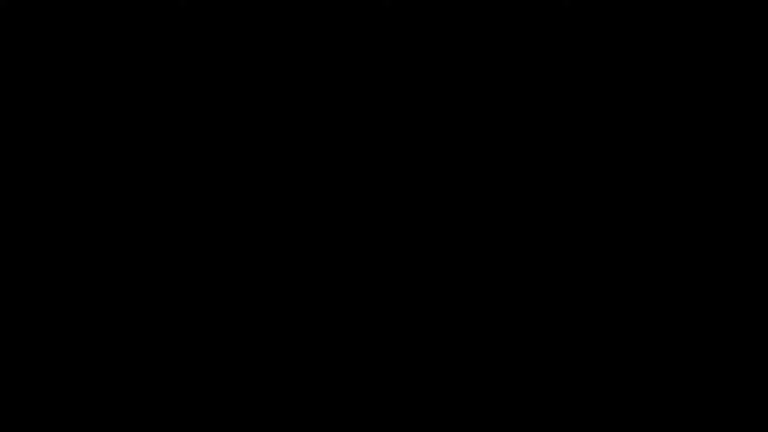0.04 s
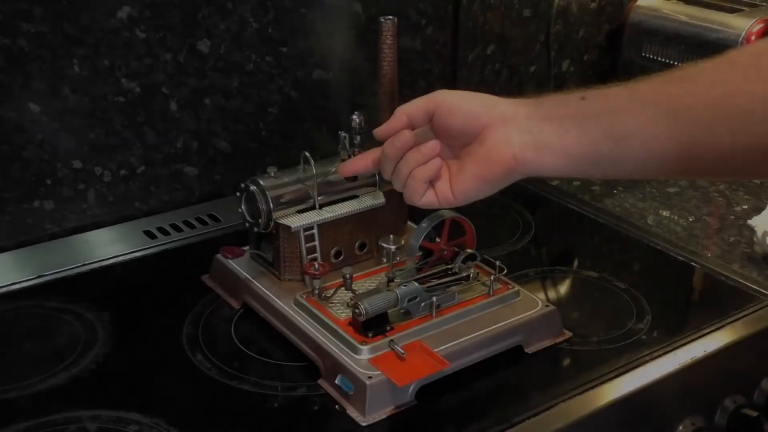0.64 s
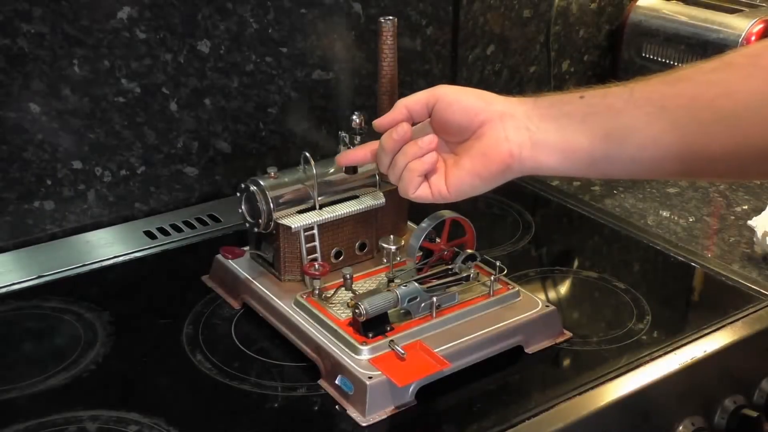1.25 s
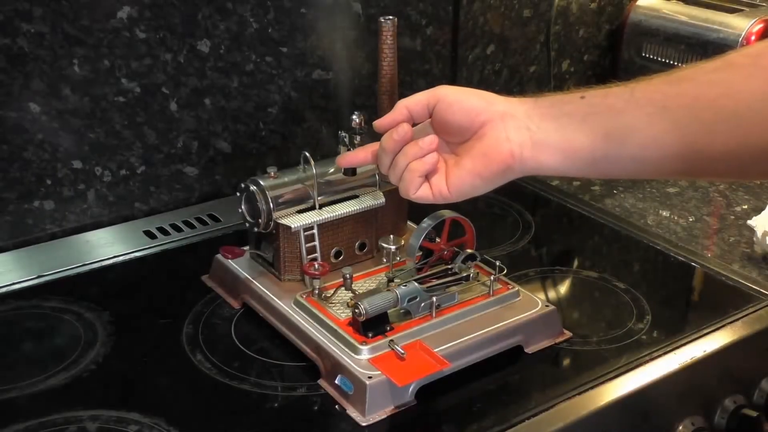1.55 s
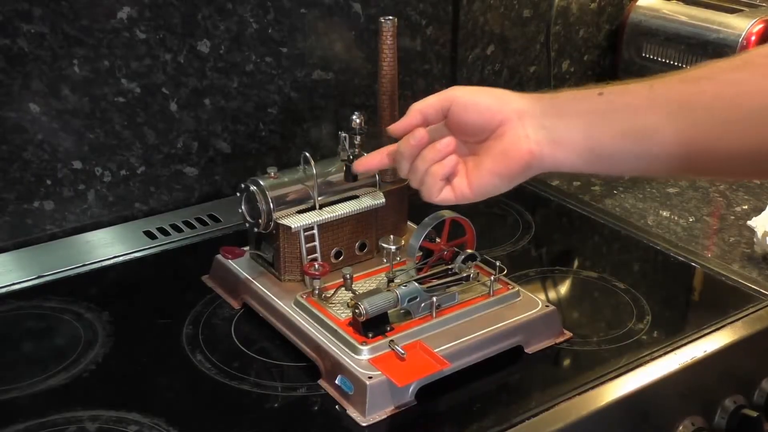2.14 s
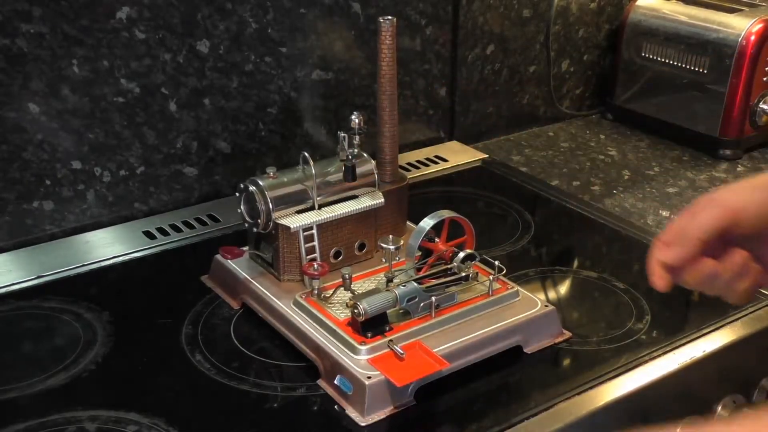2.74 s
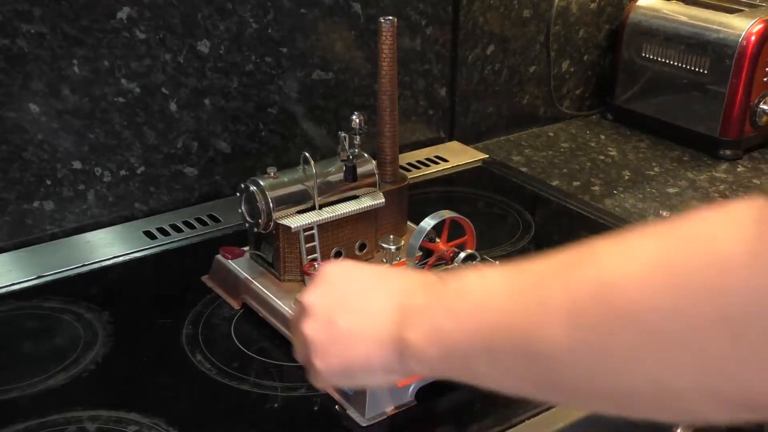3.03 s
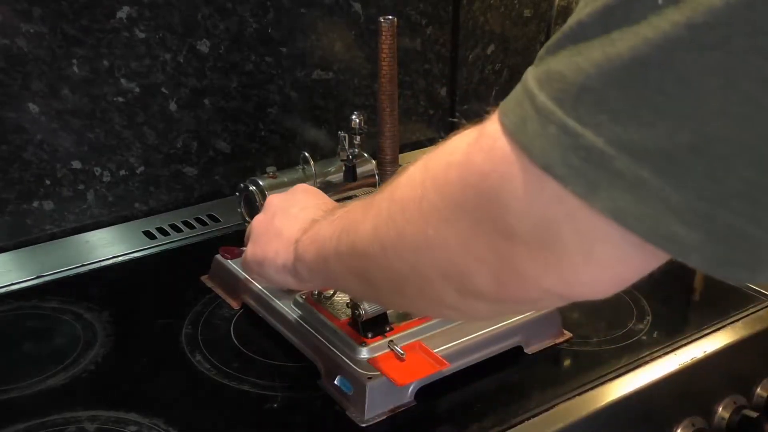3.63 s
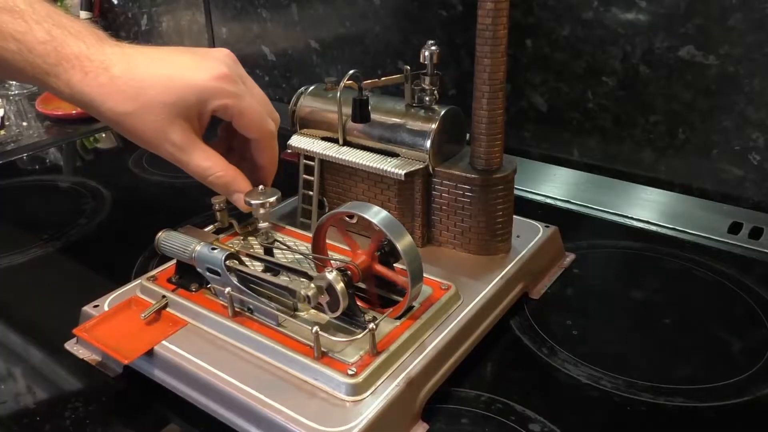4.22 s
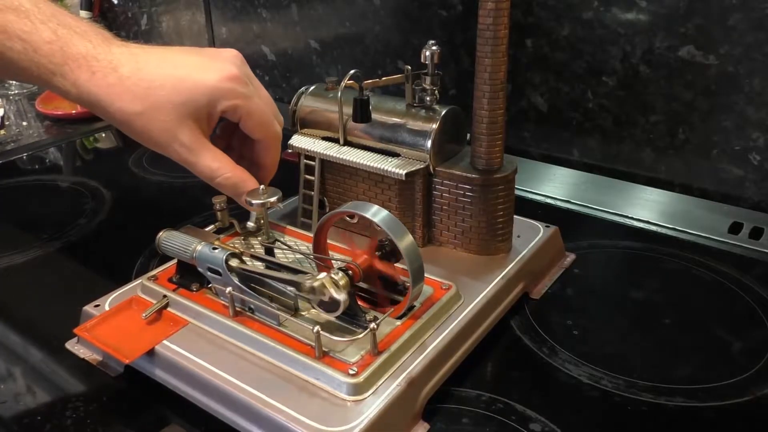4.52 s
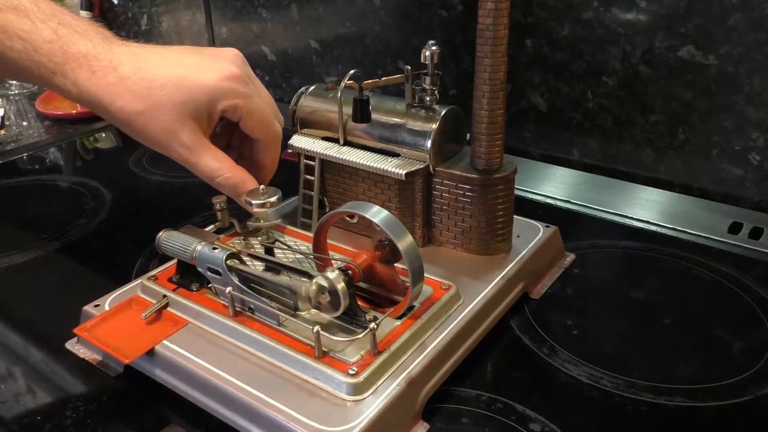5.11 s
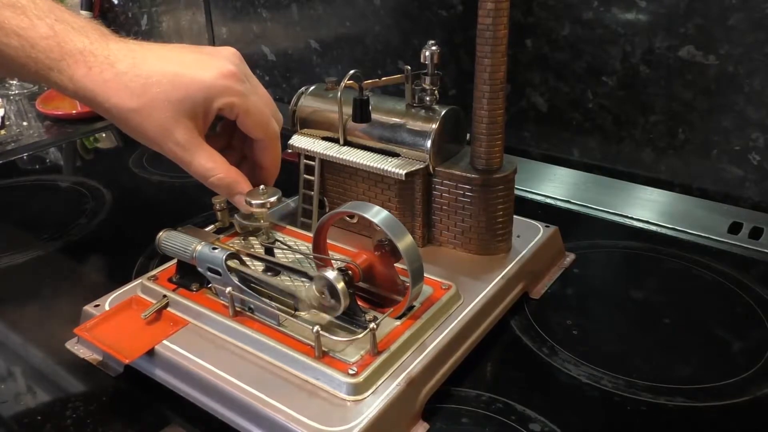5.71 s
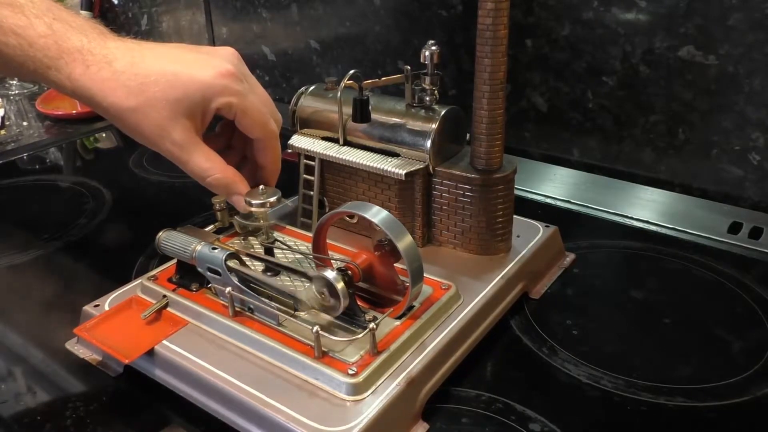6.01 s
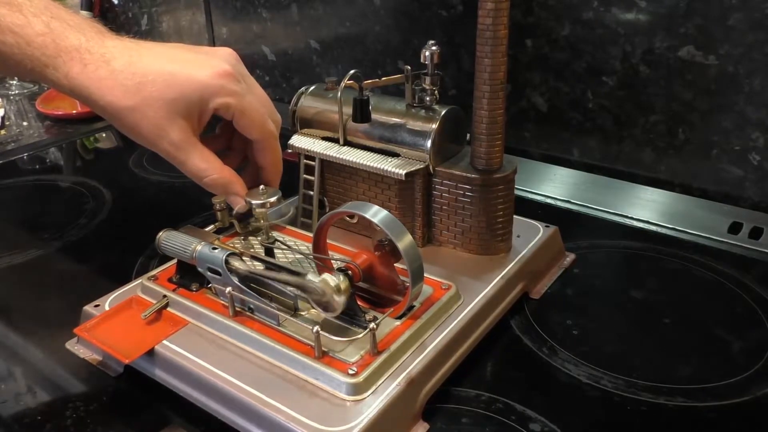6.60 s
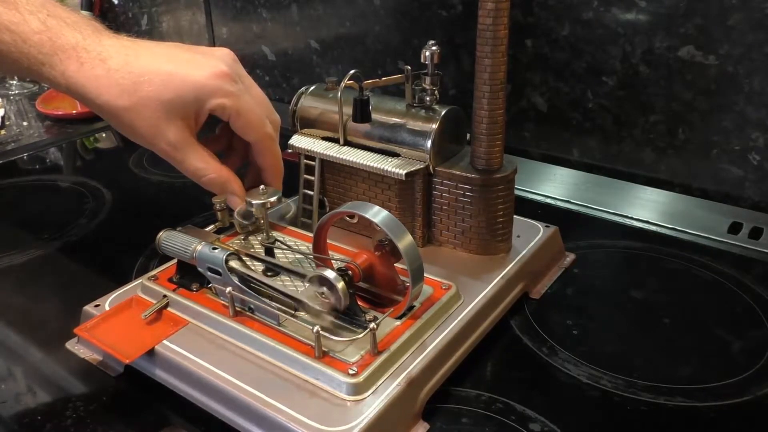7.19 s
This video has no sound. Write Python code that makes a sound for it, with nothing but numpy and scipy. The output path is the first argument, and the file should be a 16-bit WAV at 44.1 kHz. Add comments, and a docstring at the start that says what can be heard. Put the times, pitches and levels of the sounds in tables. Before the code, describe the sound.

A toy steam engine simmers in a small kitchen. Its whistle is opened twice, giving only a breathy, faintly ringing hiss while the boiler burbles. After a few dull bumps, the crank clanks and begins knocking slowly, then gathers speed into a rapid chug. Each knock rings the tin base, among steel clicks, small exhaust puffs and leaking steam, heard close by.

```python
"""Toy steam engine on a kitchen hob

The whistle is opened twice and gives only the breathy, faintly ringing hiss of a wet jet, while the
boiler burbles. After a few dull bumps the steam is let through: the crank clanks, knocks slowly,
gathers speed and settles near eleven turns a second. Each knock rings the tin base, among steel
clicks, exhaust puffs and leaking steam. The boiler simmers throughout in a small hard room."""
import sys
import numpy as np
from scipy import signal
from scipy.fft import rfft, irfft
from scipy.io import wavfile

SR = 44100
rng = np.random.default_rng(int(sys.argv[2]) if len(sys.argv) > 2 else 0)


def materialize(psi):
    """Save the field psi as 16-bit PCM at rate SR to the path in sys.argv[1].

    A 1-D psi becomes a single channel; in a 2-D psi each row is a channel.
    """
    bounded = np.clip(np.atleast_2d(psi).T, -1, 1)
    quanta = np.round(bounded * 32767).astype(np.int16)
    wavfile.write(sys.argv[1], SR, quanta)


N = 324135
TIME = np.arange(N) / SR

# modes of the tin base: (frequency [Hz], width [Hz], boost [dB])
TIN_MODES = [(131, 87, 6), (268, 21, 9), (410, 21, 7), (478.3, 24.6, 11.5), (591, 7, -7), (736, 71, 7),
             (1053, 55, 7.5), (1064, 12, 1), (1176.4, 35.6, 15), (1598, 183, 11), (1873, 114, 3),
             (2154, 150, 9), (2600, 60, 6.5), (3860, 86, 4.5)]


def engine():
    """Each turn brings a crank knock, a puff and a rod knock; scraping and leaking steam fill the gaps."""
    # steam let through to the cylinder: (time [s], level [dB])
    throttle = [(3.9, -22), (4.07, -13), (4.19, -26.5), (4.3, -6.5), (4.5, -8.5), (4.7, -13.5),
                (5.05, -13.5), (5.3, -5), (5.87, -1), (6.5, -0.5), (7.35, -3)]
    # bearing play, taken up as the engine warms:
    # (time [s], rod knock [dB], steel click [dB], rod's lag behind the crank [turns])
    play = [(4.46, -13.5, -35, 0.69), (5.15, -14, -30.5, 0.59), (5.3, -11, -31, 0.65),
            (5.9, -16.5, -31, 0.66), (6.18, -17.5, -31, 0.67), (6.27, -22.5, -41, 0.68),
            (6.72, -22, -36.5, 0.69), (7.0, -38, -40.5, 0.62), (7.35, -15, -42, 0.48)]
    steam_db, = along(throttle)
    rod_db, click_db, rod_lag = along(play)
    opened = np.clip((TIME - throttle[0][0]) / 0.25, 0, 1)
    crank_s, rod_s = strokes(0), strokes(rod_lag)[1:]
    tin = crank_knocks(crank_s, steam_db) + base_thuds(crank_s, steam_db) + exhaust(steam_db)
    tin += rod_knocks(rod_s, rod_db, slide_gain=opened * amp(-40 + 0.89 * steam_db))
    tin += opened * rumble(steam_db, rod_db)
    leak_gain = opened * amp(-47.5 + 1.3 * steam_db)
    steel = steel_clicks(crank_s, click_db, rattle_gain=amp(-3) * leak_gain) + leak_gain * steam_leak()
    return (kitchen(tin, wet_db=-12, side_db=-13.5, pan_db=0.3)
            + kitchen(steel, wet_db=-5.5, side_db=-8, pan_db=1.6))


def crank_knocks(times, steam_db):
    """The bearing touches lightly, then takes the full load 4 ms later, ringing the base."""
    # tone of the knock: (frequency [Hz], level [dB])
    body = [(90, -40), (130, -11), (400, -13), (560, -14), (750, -4), (1000, -3), (1400, -7.5), (1700, 0),
            (2100, -6), (2900, -2), (3400, -11), (4200, -11), (6000, -20), (15000, -45)]
    levels_db = force(times, -13 + 0.62 * steam_db)
    touch = chatter(times, levels_db - 8, rise=0.00193, decay=0.0066, alike=0.65)
    load = chatter(times + 0.004, levels_db - 5.5, rise=0.00174, decay=0.0078, alike=0.49)
    return colour(touch + load, body, TIN_MODES)


def base_thuds(times, steam_db):
    """Each knock pushes the base down, and it springs back."""
    # tone of the thud: (frequency [Hz], level [dB])
    thump = [(50, -35), (90, -20), (130, -8.5), (170, -8), (200, -11), (240, -2), (275, -6.5), (310, -4),
             (400, 8.5), (455, 2), (520, -15.5), (600, -4.5), (1000, -32.5), (3000, -66)]
    push_s, rebound_s = 0.00442, 0.00979
    pulses = np.zeros(N)
    for s, db in zip(times, force(times, -3.5 + 0.61 * steam_db)):
        add(pulses, s + push_s, amp([db]))
        add(pulses, s + push_s + rebound_s, -amp([db + 1]))
    return colour(pulses, thump, TIN_MODES)


def rod_knocks(times, rod_db, slide_gain):
    """The rod drags briefly before each knock, and the slides scrape unevenly."""
    # tone of the cylinder: (frequency [Hz], level [dB])
    cylinder = [(60, -30), (125, -4), (200, -5), (260, 4.5), (320, -4), (450, -5), (600, -6.5), (1000, -3),
                (1400, -3), (1800, -4.5), (2700, -2.5), (3400, -10.5), (4400, -13), (6000, -22),
                (15000, -32)]
    # the rod nudges while the flywheel still hesitates: (time [s], level [dB])
    nudges = [(4.0225, -32.5), (4.0904, -39), (4.216, -28.5), (4.3066, -34.5), (4.3492, -29),
              (4.4283, -29.5), (4.585, -28.5), (4.6016, -29.5), (4.708, -29)]
    rod = chatter(times, force(times, rod_db - 9), rise=0.0037, decay=0.011, alike=0.07)
    rod += amp(-6) * chatter(*np.transpose(nudges), rise=0.0038, decay=0.0096, alike=0.1)
    drag = chatter(times - 0.009, force(times, rod_db - 15), rise=0.0054, decay=0.008, alike=0)
    scrape = slide_gain * noise() * amp(3.5 * drift(47.5))
    return colour(rod + drag + scrape, cylinder, TIN_MODES)


def steel_clicks(times, click_db, rattle_gain):
    """Steel snaps and rattles out at each crank knock; lever and linkage tick in between."""
    # light ticks of lever and linkage: (time [s], level [dB])
    ticks = [(4.4427, -31), (5.314, -24.5), (5.3856, -20.5), (5.665, -29), (5.8616, -22), (5.9286, -21.5),
             (6.0773, -22), (6.153, -19), (6.4785, -22.5), (6.692, -27)]
    # bright tone of the steel: (frequency [Hz], level [dB])
    steel = [(1200, -42), (3000, -2), (4600, 4.5), (5800, -2.5), (7200, -0.5), (8600, 4.5), (10000, 0),
             (12000, 6.5), (13500, -9), (15800, -4)]
    levels_db = force(times, click_db + 4)
    clicks = chatter(times, levels_db, rise=0.0012, decay=0.00045, alike=0.3)
    clicks += chatter(times, levels_db, rise=0.0019, decay=0.0033, alike=0)
    clicks += amp(-9) * chatter(*np.transpose(ticks), rise=0.00073, decay=0.0031, alike=0.3)
    clicks *= amp(4.1 * drift(1100))  # separate tiny impacts within each click
    return colour(clicks + rattle_gain * rattle(), steel)


def rattle(per_second=45, decay_s=0.0012):
    """Loose linkage makes tiny random contacts of uneven size."""
    t = np.arange(SR // 50) / SR
    hits = rng.random(N) < per_second / SR
    sizes = amp(4 * np.minimum(rng.exponential(1, N), 3))
    return noise() * signal.oaconvolve(hits * sizes, np.exp(-t / decay_s))[:N]


def exhaust(steam_db):
    """The exhaust opens about a third of a turn after the crank knock and lets out a puff."""
    # tone of the puff: (frequency [Hz], level [dB])
    port = [(600, -34), (1400, -10), (2200, 6), (2750, 11.5), (3400, -6), (4300, -5), (6000, -21.5),
            (15000, -21)]
    times = strokes(0.31)
    puffs = chatter(times, force(times, -31 + 1.5 * steam_db), rise=0.011, decay=0.004, alike=0.22)
    return colour(puffs, port)


def steam_leak():
    """Escaping steam gives a high hiss."""
    # tone of the leak: (frequency [Hz], level [dB])
    leak = [(2500, 11), (4500, 9), (7000, 0), (9500, 3.5), (11500, -15), (12400, 9), (13300, -14),
            (15800, 2)]
    return colour(noise(), leak)


def rumble(steam_db, rod_db):
    """A low rumble that grows with the steam and with the play in the rod."""
    # (frequency [Hz], level [dB])
    lows = [(25, -20), (55, -17), (80, -33), (110, 1), (170, -6.5), (250, -7), (450, -13.5),
            (700, -28), (2000, -42)]
    return amp(-45 + 0.53 * steam_db + 0.63 * (rod_db - rod_db.max())) * colour(noise(), lows)


def clank():
    """As the crank first kicks over, two double blows set flywheel and frame ringing."""
    # hard blows: (time [s], level [dB])
    blows = [(4.445, -22), (4.453, -21.5), (4.632, -20), (4.636, -12)]
    # modes of flywheel and frame: (frequency [Hz], level [dB], t60 [s])
    modes = [(1070, 2, 0.14), (1310, -20, 0.12), (1900, -20, 0.2), (2300, -19, 0.09), (2850, -24, 0.09),
             (3970, -7, 0.035), (6400, -18, 0.05), (6500, -20, 0.22), (9800, -25, 0.05), (11930, -24, 0.05)]
    # crack of the impact: (frequency [Hz], level [dB])
    crack = [(500, -14), (800, -7.5), (1080, 14), (1400, 4), (2700, -4), (3900, -11.5), (5200, -23),
             (6500, -4), (7500, -27), (10000, -11.5), (13000, -6.5), (14800, -32)]
    t = np.arange(SR // 3) / SR
    ring = sum(amp(db - 60 * t / t60) * np.sin(2 * np.pi * hz * t) for hz, db, t60 in modes)
    out = amp(1) * colour(chatter(*np.transpose(blows), rise=0.0011, decay=0.0051, alike=0.23), crack)
    for s, db in blows:
        add(out, s, amp(db - 14) * ring)
    return kitchen(out, wet_db=-9.5, side_db=-14.5, pan_db=1.5)


def whistle():
    """A wet steam jet hisses without a clear note; condensed water spatters the first blast."""
    # lever held open: (start [s], length [s], attack [s], jet [dB], spatter [dB])
    blasts = [(0.182, 0.48, 0.031, -30, -25.5), (1.151, 0.79, 0.041, -28, -55)]
    # wandering edge tone, one curve per blast: (time [s], centre [Hz], drive relative to the jet [dB])
    edge_curves = [
        [(0.2, 3570, -4), (0.235, 3900, -2), (0.28, 4600, 5.5), (0.385, 4020, 8.5), (0.445, 3700, 6),
         (0.53, 4240, 2), (0.6, 4370, 3.5), (0.66, 4360, 6), (0.75, 4210, 5)],
        [(1.17, 4260, -27), (1.2, 4330, 6.5), (1.25, 4430, 2), (1.45, 4600, 5.5), (1.62, 4780, 6),
         (1.8, 4570, 4), (1.91, 4720, 6), (1.95, 4470, 8), (2.05, 4340, 6)],
    ]
    # steady narrow ringing tones in the hiss, near 3.8-5 kHz: (frequency [Hz], width [Hz], level [dB])
    ring_tones = [(3772, 34, 1), (3810, 23, -1.5), (4195, 30, 1.5), (4300, 43, -4.5), (4350, 21, 0),
                  (4340, 8.2, -6), (4960, 16, -12), (4757, 18, -6), (4900, 20, -4), (4800, 14, -9)]
    # hiss of the jet: (frequency [Hz], level [dB])
    jet = [(350, -79), (600, -31), (943, -32), (1540, -15.5), (2030, -23.5), (2420, -7), (3510, -4.5),
           (4310, -3.5), (5290, -7), (6230, -5.5), (7650, -13.5), (8770, -14.5), (11700, -10.5),
           (13000, -5), (15800, -11)]
    # fine resonances of the jet: (frequency [Hz], width [Hz], boost [dB])
    nozzle = [(1280, 65, 1), (2160, 270, 4), (5750, 93, 2), (6050, 110, 6.5), (8750, 240, 8.5),
              (9950, 630, 6.5), (13000, 600, 5)]
    # spray of condensed water: (frequency [Hz], level [dB])
    water = [(400, -11), (750, -6), (950, -11), (1500, 2.5), (2000, 0), (3200, 12), (5000, 4), (6400, 9),
             (7300, 4), (11000, 7), (15800, -1)]
    sag_db_per_s, shut_db_per_s, dry_db_per_s = 4.5, 319, 39  # pressure sinks, valve shuts, jet dries
    hiss = np.zeros(N)
    for (start, length, attack, jet_db, spatter_db), curve in zip(blasts, edge_curves):
        t = np.maximum(TIME - start, 0)
        flow = np.minimum(t / attack, 1) ** 2
        flow *= amp(-sag_db_per_s * t - shut_db_per_s * np.maximum(t - length, 0))
        hz, drive_db = along(curve)
        centre = hz * (1 + 0.0074 * drift(47))
        edge = flow * amp(jet_db + drive_db) * unit(resonate(resonate(noise(), centre, 520), centre, 2500))
        ring = sum(amp(db) * resonate(edge, f, width) for f, width, db in ring_tones)
        breath = flow * amp(jet_db) * hob_echoes(colour(noise(), jet, nozzle))
        spatter = flow * amp(spatter_db - dry_db_per_s * t + 1.5 * drift(54)) * colour(noise(), water)
        flutter = amp(0.68 * drift(150) + 0.21 * drift(42))
        hiss += flutter * (breath + amp(-11) * edge) + ring + spatter
    return kitchen(hiss + steam_spit(), wet_db=-8, side_db=-7.5, pan_db=1)


def steam_spit():
    """A separate soft spit of steam, about half a second after the second blast."""
    # the spit: (time [s], level [dB])
    spits = [(2.399, -43)]
    # (frequency [Hz], level [dB])
    tone = [(800, -12), (2200, 3.5), (4500, -2), (7000, -2), (12000, -1.5), (15800, -15)]
    return colour(chatter(*np.transpose(spits), rise=0.0023, decay=0.028, alike=0), tone)


def burble():
    """The boiler gulps as its pressure drops: swells of wavering bubbles over churning water."""
    # gulps: (start [s], length [s], level [dB], pitch [Hz], waver span [Hz])
    gulps = [(0.22, 0.22, -34, 345, 52), (0.326, 0.21, -37.5, 355, 58), (0.463, 0.12, -34.5, 345, 51),
             (0.569, 0.14, -34.5, 332, 38), (1.206, 0.094, -39, 320, 75), (1.277, 0.1, -29, 301, 11),
             (1.453, 0.13, -33.5, 300, 14), (1.606, 0.16, -44, 300, 10), (1.774, 0.12, -39.5, 297, 34.6),
             (1.878, 0.097, -42.5, 294, 50)]
    # (frequency [Hz], level [dB])
    water = [(60, -56), (140, -5.5), (185, 0), (235, 5.5), (290, -2.5), (380, 1.5), (470, -23), (900, -61)]
    waver, flutter = drift(48), amp(2 * drift(29))
    churn = colour(noise(), water)
    out = np.zeros(N)
    for start, length, db, hz, span_hz in gulps:
        swell = np.sin(np.pi * np.clip((TIME - start) / length, 0, 1))
        bubbles = flutter * np.sin(2 * np.pi * np.cumsum(hz + span_hz / 2 * waver) / SR)
        out += amp(db) * swell * (amp(-3.5) * bubbles + amp(-10.5) * span_hz / 50 * churn)
    return kitchen(out, wet_db=-15.5, side_db=-7, pan_db=1)


def bumps():
    """Dull blows, each with a broad low resonance."""
    # soft bumps: (time [s], level [dB], pitch [Hz])
    blows = [(1.97, -41.5, 129), (2.05, -52, 119), (2.844, -36.5, 231), (2.948, -46.5, 177),
             (4.026, -43, 426), (4.276, -41, 223), (4.469, -51, 160)]
    s, db, hz = np.transpose(blows)
    pitch = np.interp(TIME, s, hz)
    contacts = chatter(s, db, rise=0.002, decay=0.028, alike=0)
    boom = resonate(resonate(contacts, pitch, 100), pitch, 350)
    boom = amp(19) * signal.lfilter(*signal.butter(2, 90, "high", fs=SR), boom)
    return kitchen(boom, wet_db=-18, side_db=-9, pan_db=-0.5)


def simmer():
    """The hot boiler fizzes and sings thinly near 1370 Hz."""
    # course of the simmer: (time [s], fizz [dB], singing [dB])
    levels = [(0, -56, -70), (1, -59, -66), (2.3, -60, -71.5), (2.75, -55.5, -62), (3.05, -54.5, -65.5),
              (3.7, -57.5, -62), (3.9, -53.5, -62), (7.35, -50, -62)]
    # tone of the fizz: (frequency [Hz], level [dB])
    tone = [(700, -41.5), (1020, 8), (1200, 8), (1500, 9), (1800, 5.5), (2200, 5), (4400, 1.5),
            (6500, -1.5), (11000, 2), (14500, 0.5), (15600, 3)]
    # (frequency [Hz], width [Hz], boost [dB])
    peaks = [(3310, 190, 3.8), (4420, 110, 5), (4860, 67, 6.7)]
    fizz_gain, singing_gain = amp(along(levels))
    fizz = fizz_gain * colour(noise(), tone, peaks)
    singing = singing_gain * unit(resonate(resonate(noise(), 1358, 37), 1368, 100))
    return kitchen(fizz + singing, wet_db=-14.5, side_db=-5.5, pan_db=0.3)


def room_air():
    """Faint low room tone, partly shared by both ears."""
    # tone of the air: (frequency [Hz], level [dB])
    tone = [(15, -22), (25, -12), (124, -0.5), (189, 0), (253, -5), (339, -5.5), (857, -21.5), (1000, -12),
            (1300, -30), (2200, -120)]
    left, right, shared = (colour(noise(), tone) for _ in range(3))
    return amp(-56.5) * unit(shared + 1.34 * np.array([left, right]))


def hob_echoes(x):
    """Glass top and wall mirror the jet."""
    # reflections: (delay [s], level [dB])
    echoes = [(0.0009, -15), (0.0023, -17)]
    out = x.copy()
    for s, db in echoes:
        add(out, s, amp(db) * x)
    return out


def kitchen(x, wet_db, side_db, pan_db):
    """Direct sound plus a short tail; side-wall sound differs between the ears, least in the bass."""
    # decay of the room: (frequency [Hz], t60 [s])
    decay = [(150, 0.83), (1000, 0.21), (4000, 0.27), (9000, 0.23), (15000, 0.039)]
    # (frequency [Hz], level [dB])
    wall_tone = [(150, -17), (1000, 1), (2500, 0.5), (5000, -2), (9000, -7.5), (13000, 5.5)]
    t = np.arange(SR // 2) / SR
    taps = rng.standard_normal((2, len(t))) * np.clip((t - 0.003) / 0.00043, 0, 1)
    hz, age, bands = signal.stft(taps, SR, nperseg=256)
    bands *= amp(-60 * age / read(decay, hz)[:, None])
    bands[1] *= amp(read(wall_tone, hz))[:, None]
    tail, walls = signal.istft(bands, SR, nperseg=256)[1]
    size = np.linalg.norm(tail)
    mid = x + amp(wet_db) * signal.oaconvolve(x, tail / size)[:N]
    side = amp(side_db) * signal.oaconvolve(x, walls / size)[:N]
    balance = amp([[pan_db / 2], [-pan_db / 2]])
    return np.array([mid + side, mid - side]) * balance / np.hypot(1, amp(wet_db))


def strokes(lag):
    """The moments at which the flywheel is lag turns past the crank knock."""
    # the flywheel lurches once as it gets going: (time [s], speed [turns/s])
    speed = [(4.46, 2.584), (4.75, 4.728), (5.03, 6.05), (5.16, 9.12), (5.27, 7.238), (5.4, 8.403),
             (5.85, 9.992), (6.3, 10.96), (6.72, 11.507), (7.35, 10.805)]
    turns = np.cumsum(along(speed)[0] * (TIME >= speed[0][0])) / SR - lag
    return TIME[np.searchsorted(turns, np.arange(turns[-1]), side="right").clip(0, N - 1)]


def force(times, curve_db, spread_db=0.5):
    """Each stroke's level in dB: no two are equally strong."""
    return np.interp(times, TIME, curve_db) + spread_db * rng.standard_normal(len(times))


def chatter(times, levels_db, rise, decay, alike):
    """Bursts of contacts that rise and decay [s]; alike (0-1) is the share that repeats in each."""
    t, out = np.arange(SR // 10) / SR, np.zeros(N)
    shape = np.minimum(t / rise, 1) ** 1.55 * np.exp(-np.maximum(t - rise, 0) / decay)
    same = rng.standard_normal(len(t))
    for _ in range(4):  # the contacts favour no pitch
        flat = irfft(np.exp(1j * np.angle(rfft(same * shape))), len(t))
        same = unit(flat * shape / (shape ** 2 + 0.01))
    same *= np.linalg.norm(shape) / np.linalg.norm(same * shape)
    for s, db in zip(times, levels_db):
        contacts = np.sqrt(alike) * same + np.sqrt(1 - alike) * rng.standard_normal(len(t))
        add(out, s, amp(db) * shape * contacts)
    return out


def colour(x, spectrum, modes=()):
    """Minimum-phase filter of unit energy: a smooth spectrum with ringing peaks."""
    hz = np.fft.rfftfreq(8192, 1 / SR)
    gain = amp(read(spectrum, hz))
    for f, width, db in modes:
        gain *= np.sqrt(1 + (amp(db) ** 2 - 1) / (1 + (2 * (hz - f) / width) ** 2))
    cepstrum = irfft(np.log(gain))[:len(hz) - 1]
    cepstrum[1:] *= 2
    taps = irfft(np.exp(rfft(cepstrum, 2 * len(cepstrum))))[:len(cepstrum)]
    return signal.oaconvolve(x, taps / np.linalg.norm(taps))[:N]


def resonate(x, hz, width):
    """A resonance, width Hz wide, whose pitch can follow a curve."""
    carrier = np.exp(2j * np.pi * np.cumsum(hz * np.ones(N)) / SR)
    pole = np.exp(-np.pi * width / SR)
    return 2 * (carrier * signal.lfilter([1 - pole], [1, -pole], x / carrier + 1e-18)).real


def drift(hz):
    """Random wander of rms 1, up to hz."""
    return unit(irfft(rfft(noise()) / (1 + (np.fft.rfftfreq(N, 1 / SR) / hz) ** 4), N))


def noise():
    """White noise."""
    return rng.standard_normal(N)


def along(points):
    """The columns of a curve over time, joined by straight lines."""
    s, *columns = np.transpose(points)
    return [np.interp(TIME, s, column) for column in columns]


def read(points, hz):
    """Joins points on a log-frequency axis."""
    f, value = np.transpose(points)
    return np.interp(np.log(hz + 1), np.log(f + 1), value)


def add(mix, s, sound):
    """Mixes a sound in at s seconds."""
    part = mix[max(round(s * SR), 0):][:len(sound)]
    part += sound[:len(part)]


def amp(db):
    """Decibels to gain."""
    return 10 ** (np.asarray(db) / 20)


def unit(x):
    """Scales to rms 1."""
    return x / np.sqrt(np.mean(x ** 2) + 1e-20)


def scene():
    """All sources together, in stereo."""
    return engine() + clank() + whistle() + burble() + bumps() + simmer() + room_air()


def record(dry):
    """A moment of silence, a quick fade-in, and the highest treble cut away."""
    start_s, fade_s, cutoff_hz = 0.073, 0.015, 15900
    fade_in = np.clip((TIME - start_s) / fade_s, 0, 1)
    lowpass = signal.firwin(511, cutoff_hz, window=("kaiser", 9), fs=SR)
    return signal.oaconvolve(dry * fade_in, lowpass[None], "same")


dry = scene()
out = record(dry)
materialize(out)
```